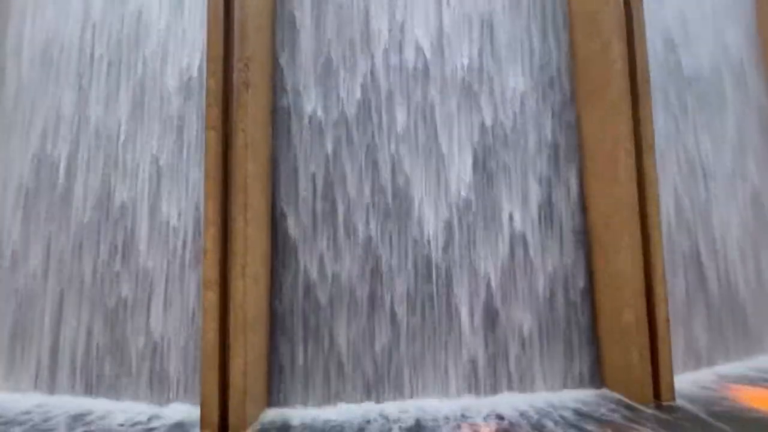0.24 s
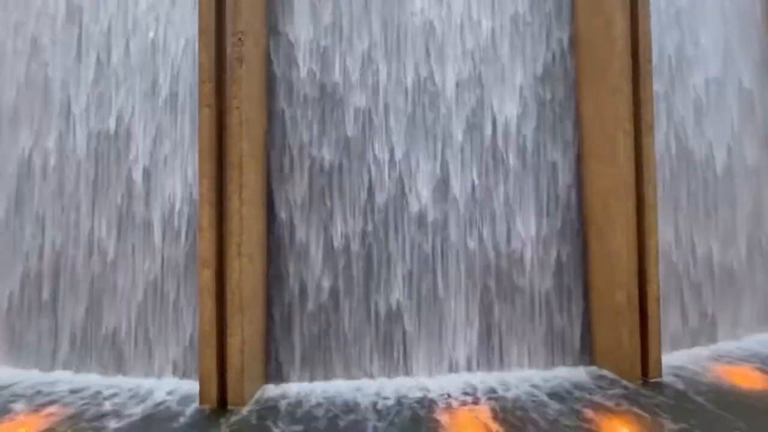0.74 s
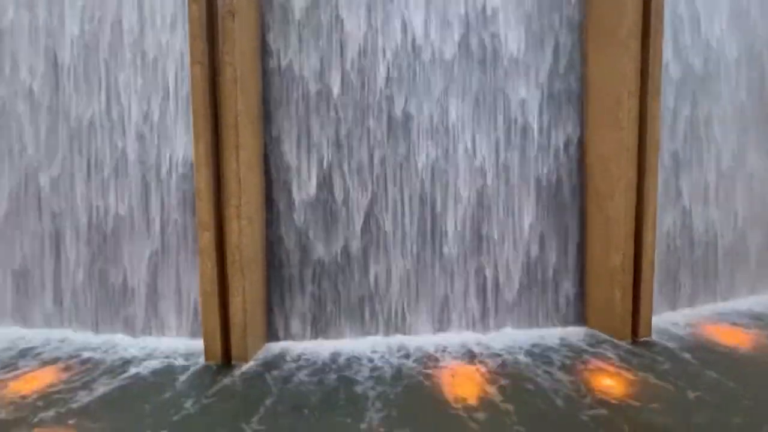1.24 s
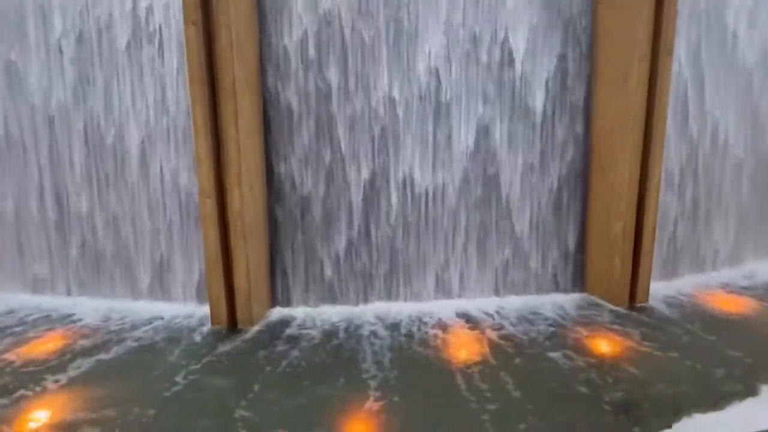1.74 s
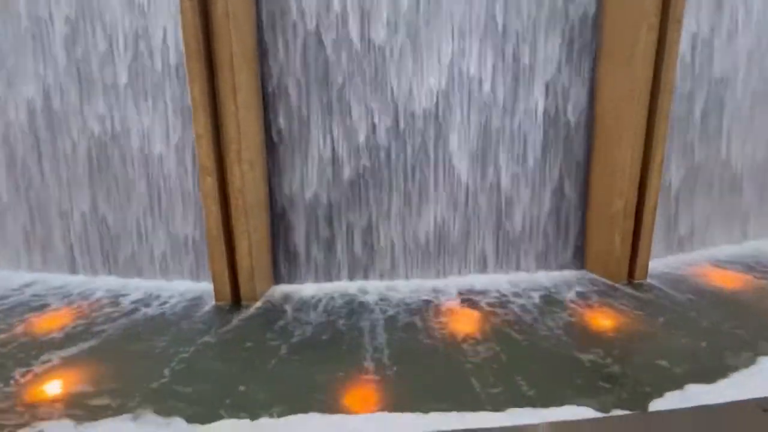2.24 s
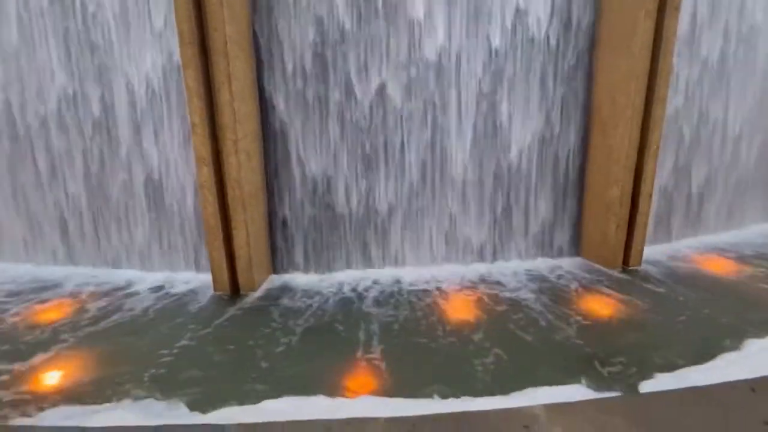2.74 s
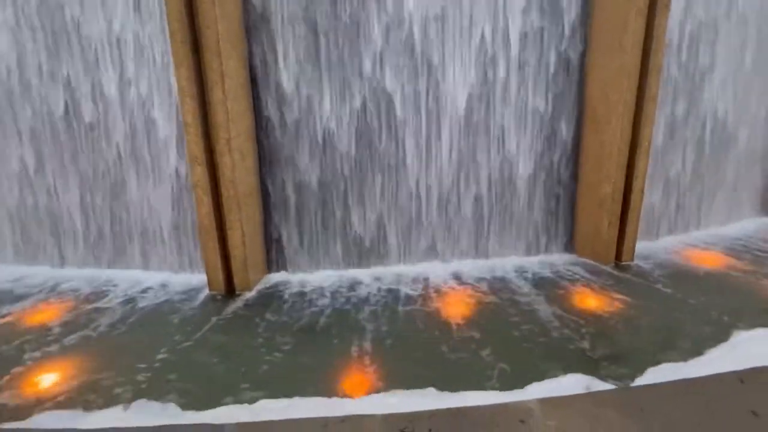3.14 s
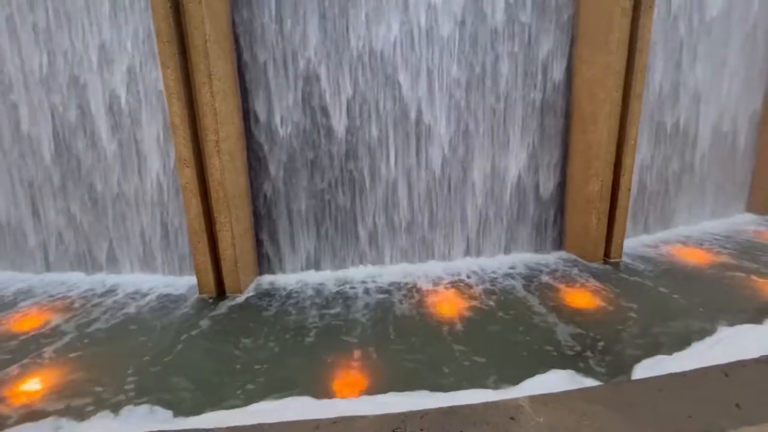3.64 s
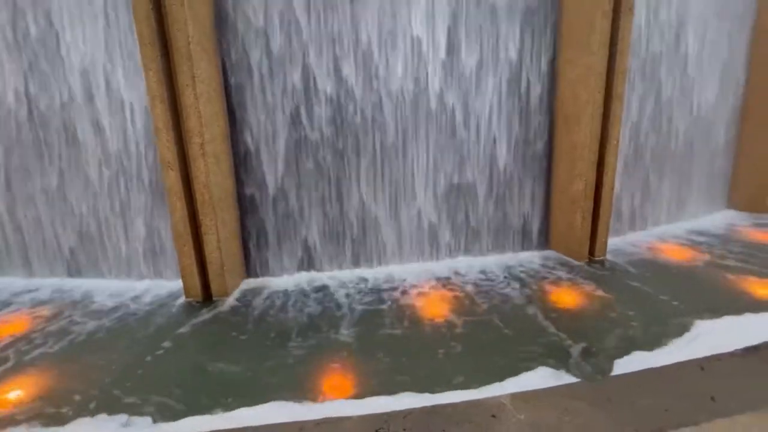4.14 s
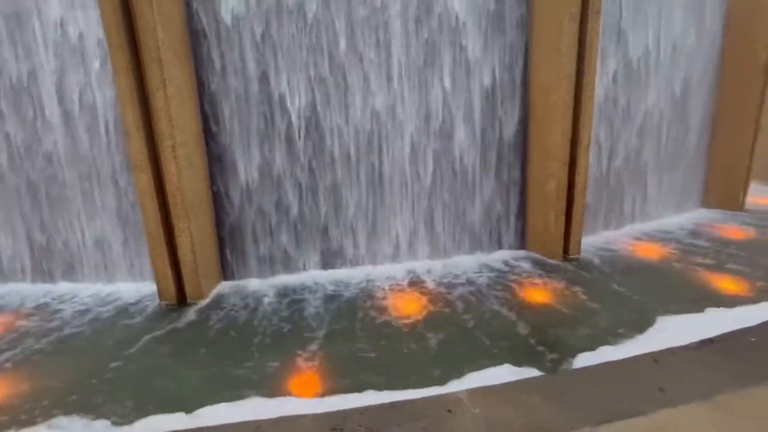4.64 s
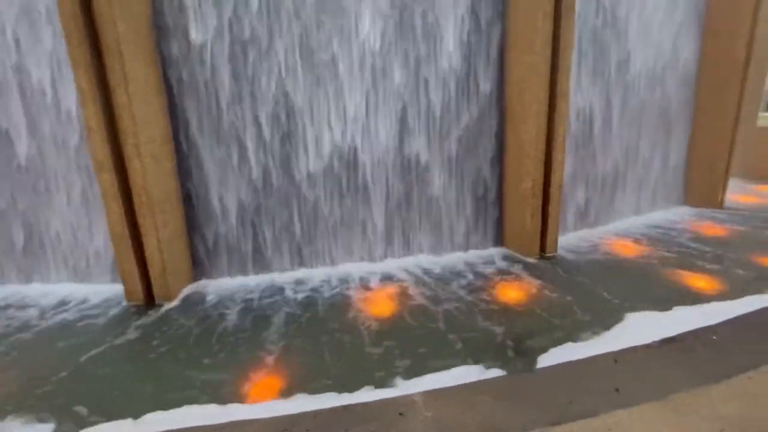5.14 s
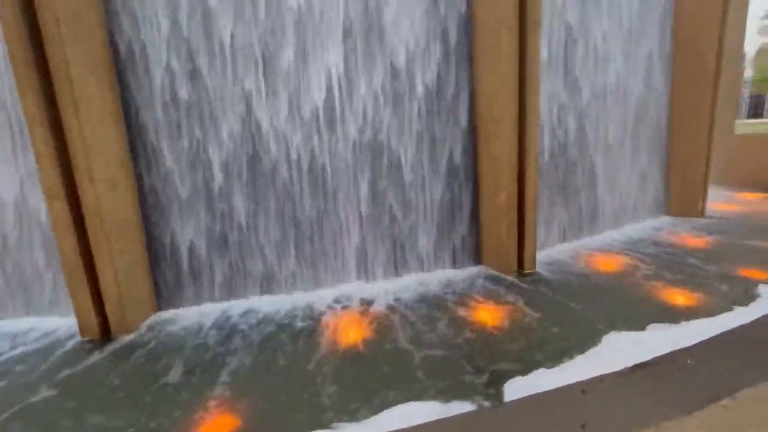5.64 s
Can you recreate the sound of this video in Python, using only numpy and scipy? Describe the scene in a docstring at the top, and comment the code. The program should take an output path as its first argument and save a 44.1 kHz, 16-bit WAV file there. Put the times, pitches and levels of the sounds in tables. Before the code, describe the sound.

Close smooth waterfall rush with faint bubbling, a deep passing engine drone, low pump hum, city rumble and one brief wind thump.

```python
"""Outdoors, close to a tall grooved wall: a sheet of water runs down it and breaks into a shallow basin.
Countless random drop impacts, coloured by band, merge into a smooth roar with ringing bubbles in it.
A pump hums and a heavy engine drones past, both made of near sines, over city rumble of low noise.
Wind puffs, short pulses with lumpy low noise, thump the two microphone ports; low tones swell briefly.
The listener tilts and turns away, then partly back, which changes the water's colour at each port."""
import sys
import numpy as np
from scipy import signal
from scipy.fft import rfft, irfft
from scipy.io import wavfile

SR = 44100
rng = np.random.default_rng(int(sys.argv[2]) if len(sys.argv) > 2 else 0)


def put_to_file(sound):
    """Save the sound as 16-bit audio at rate SR, in the file named by the first command-line argument."""
    columns = np.atleast_2d(sound).T  # one column per channel
    safe = np.clip(columns, -1, 1)
    whole_steps = np.round(safe * 32767)
    wavfile.write(sys.argv[1], SR, whole_steps.astype(np.int16))


def invert_db(x):
    """Field ratio 10**(x/20) for x, a level in decibels (scalar or array-like)."""
    u = np.asarray(x, float) / 20
    return 10 ** u


N = 259749
T = np.arange(N) / SR
HZ = np.maximum(np.fft.rfftfreq(N, 1 / SR), 1)


def in_time(rows):
    """Columns of a table, joined by straight lines in time."""
    s, *columns = np.transpose(rows)
    return [np.interp(T, s, c) for c in columns]


def in_hz(rows, hz):
    """Columns of a table, joined by straight lines on a log-frequency axis."""
    f, *columns = np.transpose(rows)
    return np.array([np.interp(np.log(hz), np.log(f), c) for c in columns])


def drift(rate_hz):
    """Slow chance of spread 1: noise twice through a one-pole low-pass, at every 40th sample."""
    r = np.exp(-80 * np.pi * rate_hz / SR)
    noise = rng.standard_normal(N // 40 + 2002)
    slow = signal.lfilter([1], [1, -2 * r, r * r], noise)[2000:]   # skip the filter's start
    return np.interp(np.arange(N) / 40, np.arange(len(slow)), slow / slow.std())


def port_pair(source):
    """Spectra at both ports: two unrelated sources mixed to the likeness, the right one turned in phase."""
    # sound shared by both ports: (frequency [Hz], likeness [0-1])
    shared = [(90, 0.91), (256, 0.82), (433, 0.05), (620, 0.36), (775, 0.15), (900, 0.5), (1020, 0.1),
              (1120, 0.33), (1400, 0.26), (1800, 0.16), (2050, 0.02), (2500, .3), (2900, 0.22), (3100, 0),
              (3500, 0.1), (7000, 0.14), (9300, 0.05), (9900, 0.63), (10400, 0.79), (11500, 0.85),
              (12900, 0.8), (13200, 0.9), (14350, .97), (14650, .68), (15300, .98)]
    # phase lead of the right port, rising overall but falling back in places: (frequency [Hz], lead [turns])
    right_lead = [(430, 0), (720, .02), (810, .5), (970, 0.5), (1060, 0), (1130, .04), (1380, .47),
                  (1850, .5), (2100, 1.0), (2950, 1), (3250, 1.34), (3550, 1.3), (4400, 2.1), (4800, 1.8),
                  (5700, 2.5), (6600, 3), (7400, 2.5), (8000, 3.5), (9300, 3.5), (9800, 4.5), (10600, 4.5),
                  (11600, 5), (12300, 5), (12950, 5.5), (13200, 5.5), (14350, 5.5), (14650, 5.82),
                  (15400, 5.98)]
    alike = np.clip(in_hz(shared, HZ)[0], 0, 1)
    turns = np.interp(HZ, *np.transpose(right_lead))
    one, other = rfft(source, axis=1)
    common = np.sqrt((1 + alike) / 2) * one
    apart = np.sqrt((1 - alike) / 2) * other
    return np.array([common + apart, (common - apart) * np.exp(2j * np.pi * turns)])


def drops(per_s, spread_db):
    """Two dense showers of drop impacts of uneven size and sign; rms 1."""
    sizes = invert_db(spread_db * rng.exponential(1, (2, N))) * rng.choice([-1, 1], (2, N))
    shower = sizes * (rng.random((2, N)) < per_s / SR)
    return shower / shower.std()


def water(surge_db=0.07, patch_db=0.78, flicker_db=0.58):
    """The shower takes the roar's colour; each band swells with the flow, in patches, and with the facing."""
    # roar at each port before the low cut: (frequency [Hz], left [dB per Hz], right [dB per Hz])
    roar = [(279, -57.5, -59), (444, -64.5, -63.5), (560, -60, -58.5), (664, -57, -59), (770, -56.5, -61),
            (920, -60.5, -61.5), (1110, -58.5, -59), (1230, -56, -59), (1600, -58, -59), (1990, -58.5, -61),
            (2220, -61, -61.5), (2750, -61.5, -62.5), (3240, -64, -64.5), (3930, -64, -67),
            (5260, -59.5, -72.5), (6460, -58.5, -70.5), (7520, -57, -69), (8740, -60.5, -66),
            (9230, -64.5, -63), (9670, -67, -65.5), (11100, -64, -66), (13000, -71.5, -70),
            (14000, -69, -68.5), (15200, -66.5, -67.5)]
    # how far the ports face the wall: (time [s], facing [0-1])
    facing_wall = [(0, 0.96), (.5, 0.72), (1.0, 0.74), (1.4, 0.52), (1.9, 0.2), (2.4, 0.08), (3.2, 0),
                   (4, 0.2), (5, 0.12), (5.45, .05), (5.89, 0.6)]
    # gain for one whole unit of facing: (frequency [Hz], left [dB], right [dB])
    facing_gain = [(300, -1.5, -0.5), (1500, 3, 0.5), (3020, -0.5, 3.5), (6500, 5.5, -0.5), (9130, -1, 6.5),
                   (11000, 0, -2.5)]
    colour = invert_db(in_hz(roar, HZ)) * np.sqrt(SR / 2)
    colour = colour / np.sqrt(1 + (270 / HZ) ** 8)   # the rumble takes over below 270 Hz
    spectra = port_pair(drops(per_s=25000, spread_db=1.5)) * colour
    facing, = in_time(facing_wall)
    turning = facing - facing.mean()
    surge = surge_db * drift(2.3)
    centres = np.geomspace(350, 15000, num=9)
    out = 0
    for k, hz in enumerate(centres):
        # overlapping bands add up to one
        share = np.interp(np.log(HZ), np.log(centres), np.arange(len(centres)) == k)
        patches = patch_db * (1000 / hz) ** .3 * drift(4.9)
        flicker = flicker_db * hz / 8000 * drift(45)   # level flickers more strongly towards the treble
        gain_db = in_hz(facing_gain, hz)[:, None] * turning + surge + patches + flicker
        out = out + invert_db(gain_db) * irfft(spectra * share, N, axis=1)
    return out


def bubbles(per_s=150, level_db=-37.5, cycles=30.0):
    """Air trapped in the basin: each bubble rings at one port, falling 60 dB in the given cycles."""
    out = np.zeros((2, N))
    for hz in np.geomspace(1000, 3000, num=14):
        born = rng.random((2, N)) < per_s / 28 / SR   # 14 pitches at two ports share the rate
        strength = invert_db(3.1 * np.minimum(rng.exponential(1, (2, N)), 3))
        r, w = invert_db(-60 * hz / (cycles * SR)), 2 * np.pi * hz / SR
        out += signal.lfilter([0, np.sin(w)], [1, -2 * r * np.cos(w), r * r], born * strength + 1e-18)
    return invert_db(level_db) * out / out.std()


def tone(hz, level_db, orders, waver_db, lean_db, lag_turns):
    """Near sines on multiples of one pitch; they waver a little in level and lean to one port."""
    phase = 2 * np.pi * (np.cumsum(hz) / SR + np.array([[0], [lag_turns]]))
    sines = sum(invert_db(db + waver_db * drift(6.3)) * np.sin(multiple * phase) for multiple, db in orders)
    return np.sqrt(2) * invert_db(level_db + np.array([[lean_db], [-lean_db]])) * sines


def engine():
    """The low firing orders of a heavy engine that speeds up, nears, passes and leaves."""
    # the strong order and faint drones around it: (multiple of the pitch [1], level [dB])
    orders = [(.55, -25), (1.0, 0), (1.63, -28), (1.95, -25.5)]
    # passage of the strong order, before dips, waver and lean: (time [s], level [dB rms])
    passage = [(0, -30), (.15, -24), (.7, -22.5), (1.2, -20.5), (1.7, -18.5), (1.88, -22.5), (2.24, -24),
               (2.45, -30), (2.97, -28.5), (3.25, -32), (3.45, -59)]
    # the drone dips briefly: (time [s], depth [dB])
    dips = [(.57, 5), (1.03, 5.5), (2.36, 5), (2.87, 2), (3.1, 13)]
    dip_s = 0.053
    start_hz, rise_hz_per_s, rise_from_s = 97.16, 2.8, 0.503   # holds, then climbs evenly
    hz = start_hz + rise_hz_per_s * np.maximum(T - rise_from_s, 0)
    dip_db = sum(db * np.exp(-((T - s) / dip_s) ** 2) for s, db in dips)
    level_db = in_time(passage)[0] - dip_db
    return tone(hz, level_db, orders, waver_db=0.9, lean_db=-0.5, lag_turns=0.012)


def puffs():
    """Each eddy pushes the ports for a cycle or two, differently on each side."""
    # wind puffs: (time [s], frequency [Hz], left peak [full scale], right peak [full scale])
    eddies = [(4.29, 100, -0.22, 0.074), (4.343, 60, 0.055, -.08), (4.397, 130, -0.22, 0.018),
              (4.429, 110, 0.072, -0.097)]
    half_cycles = 1.4   # half length of the envelope, in cycles
    out = np.zeros((2, N))
    for s, hz, left, right in eddies:
        cycles = hz * (T - s)
        pulse = np.exp(-(cycles / half_cycles) ** 2) * np.cos(2 * np.pi * cycles)
        out += np.outer([left, right], pulse)
    return out


def gust():
    """Low turbulence around the puffs pushes the two ports in opposite directions, in lumps."""
    centre_s, half_s, level_db = 4.35, 0.097, -34
    band = signal.butter(2, [50, 320], "band", fs=SR, output="sos")
    noise = signal.sosfilt(band, rng.standard_normal(N))
    shape = np.exp(-((T - centre_s) / half_s) ** 4) * invert_db(level_db + 3.0 * drift(25))
    return np.outer([1, -1], shape * noise / noise.std())


def pump():
    """A low hum from the water pump: one sine, wavering a little in pitch and level."""
    # hum before waver and lean: (time [s], level [dB rms])
    hum = [(0, -36), (.9, -43), (1.5, -37), (1.9, -40), (2.7, -37), (2.93, -31), (3.1, -41), (3.3, -36),
           (3.8, -32), (4.2, -34), (4.6, -35.5), (5.1, -36), (5.28, -31.5), (5.5, -45), (5.89, -35)]
    hz = 73.656 + 1.2276 * drift(2.45)
    return tone(hz, in_time(hum)[0], [(1, 0)], waver_db=1.5, lean_db=-1.0, lag_turns=0.01287)


def swells():
    """Short soft low tones in the traffic, alike at both ports, under bell-shaped envelopes."""
    # tones: (time [s], half length [s], frequency [Hz], level at the top [dB rms])
    soft_tones = [(3.92, .09, 146, -32.5), (3.98, 0.1, 96, -36), (4.25, .12, 101, -33.5),
                  (5.823, 0.087, 100, -35)]
    out = 0
    for s, half_s, hz, db in soft_tones:
        envelope = np.sqrt(2) * invert_db(db) * np.exp(-((T - s) / half_s) ** 2)
        out = out + envelope * np.sin(2 * np.pi * hz * T + rng.uniform(0, 2 * np.pi))
    return out


def rumble():
    """Far city traffic: low noise in soft surges, mostly alike at both ports, thinning out slowly."""
    # colour of the rumble, levelled afterwards: (frequency [Hz], relative level [dB])
    low_colour = [(13, -65), (22, -44), (45, -7.5), (65, -3), (119, -5.5), (151, -6.5), (183, -8.5),
                  (235, -12), (330, -27), (430, -54), (730, -120)]
    start_db, surge_db, fade_db_per_s = -31, 0.54, 0.15
    spectra = port_pair(rng.standard_normal((2, N))) * invert_db(in_hz(low_colour, HZ))
    noise = irfft(spectra, N, axis=1)
    return invert_db(start_db - fade_db_per_s * T + surge_db * drift(6.1)) * noise / noise.std()


def scene():
    """Water, bubbles, rumble, engine, pump, swells and wind at the two ports."""
    return water() + bubbles() + rumble() + engine() + pump() + swells() + puffs() + gust()


def roll_off(x):
    """The treble ends steeply here."""
    return signal.sosfilt(signal.butter(12, 17110, fs=SR, output="sos"), x)


def record(dry):
    """A steep low-pass cuts the top of the mix at 15870 Hz."""
    cut = signal.cheby2(30, 60, 15870, fs=SR, output="sos")
    mix = signal.sosfilt(cut, dry)
    return roll_off(mix)


dry = scene()
out = record(dry)
put_to_file(out)
```